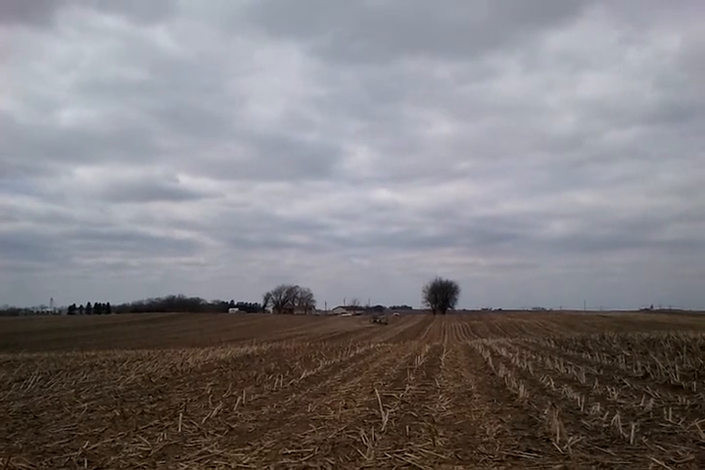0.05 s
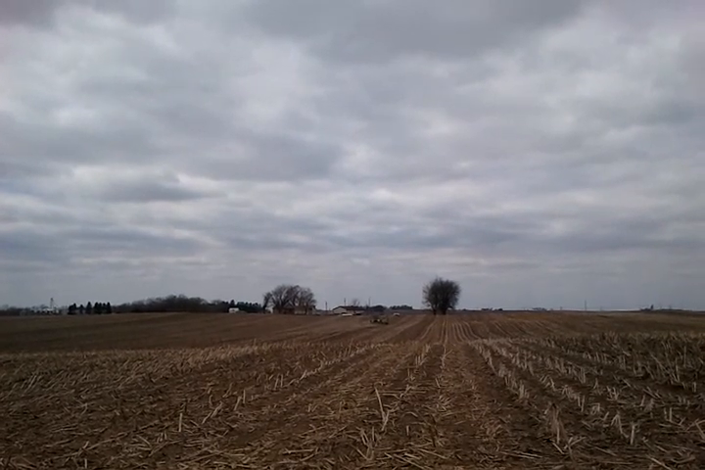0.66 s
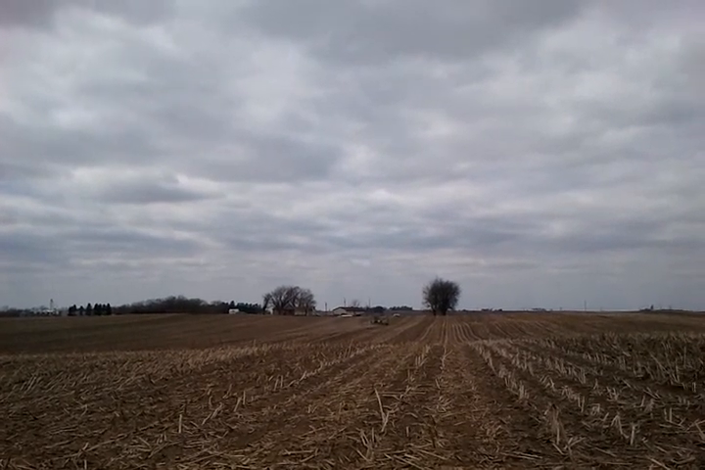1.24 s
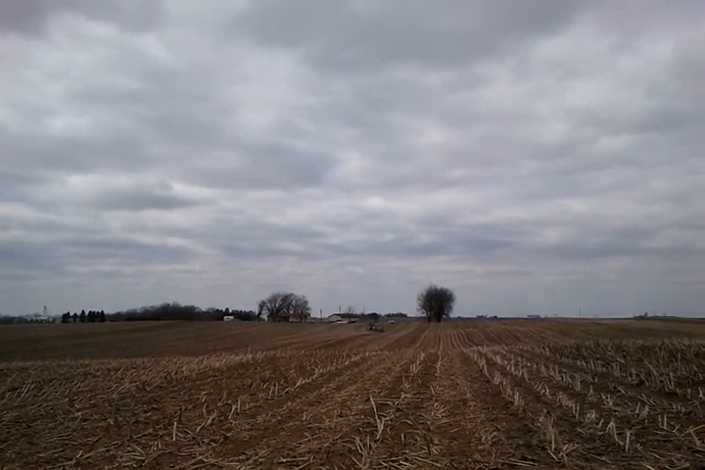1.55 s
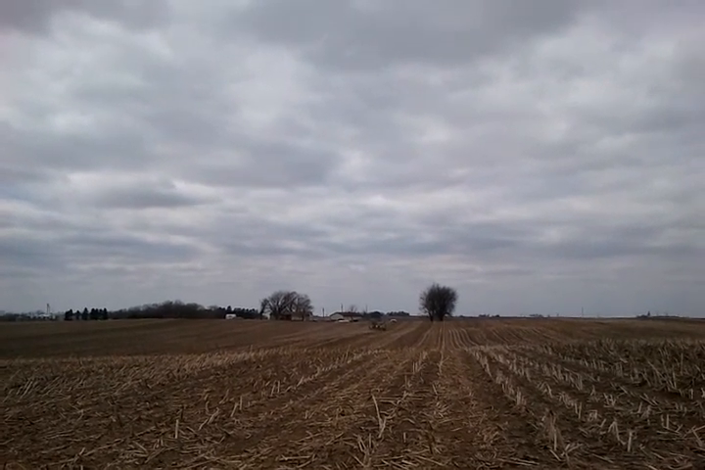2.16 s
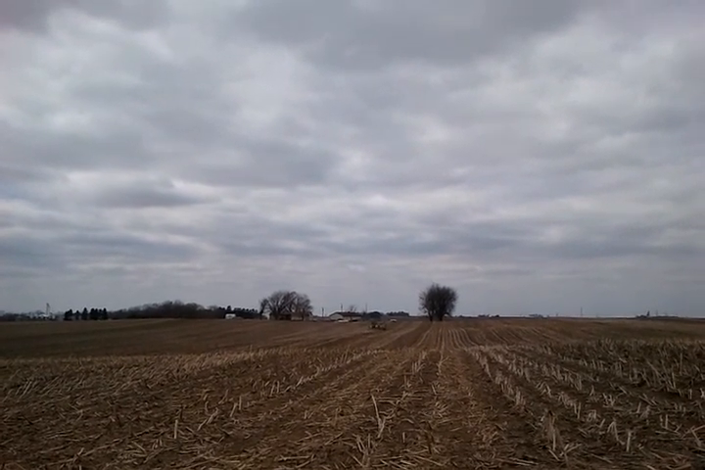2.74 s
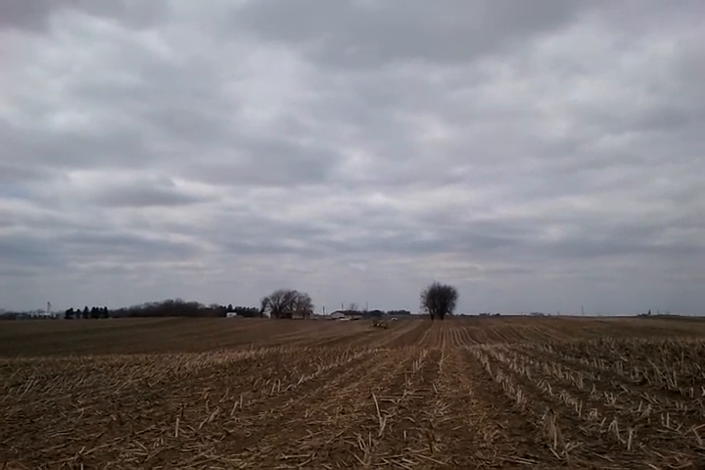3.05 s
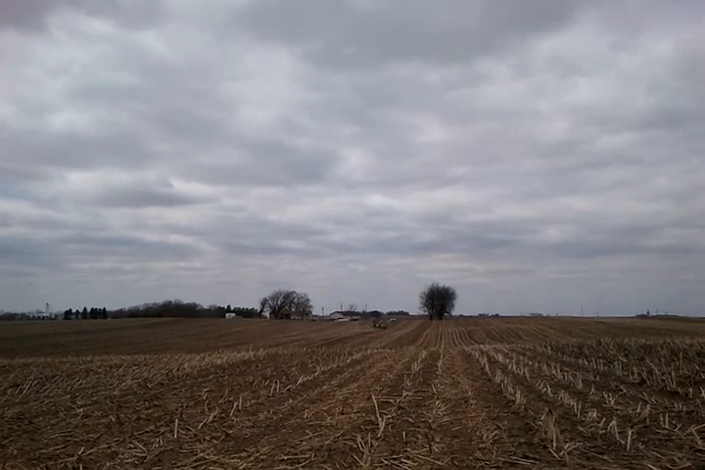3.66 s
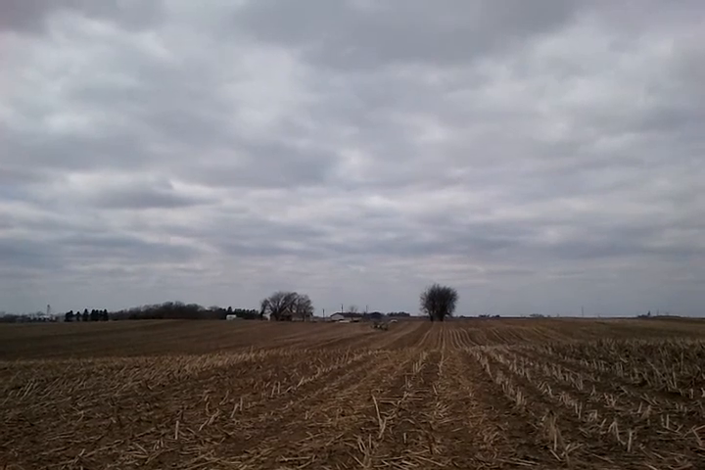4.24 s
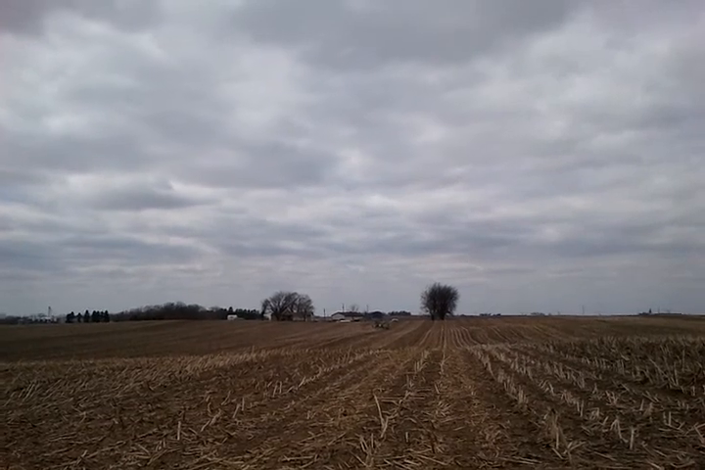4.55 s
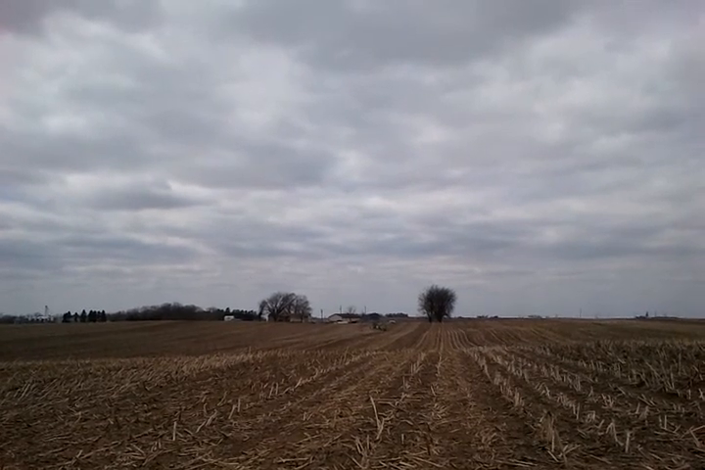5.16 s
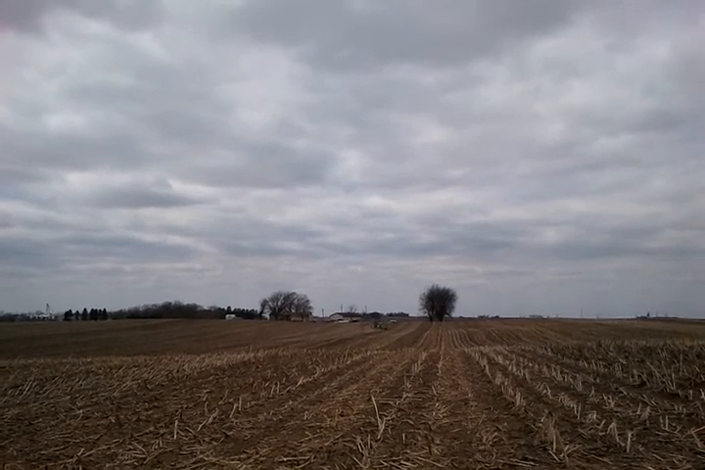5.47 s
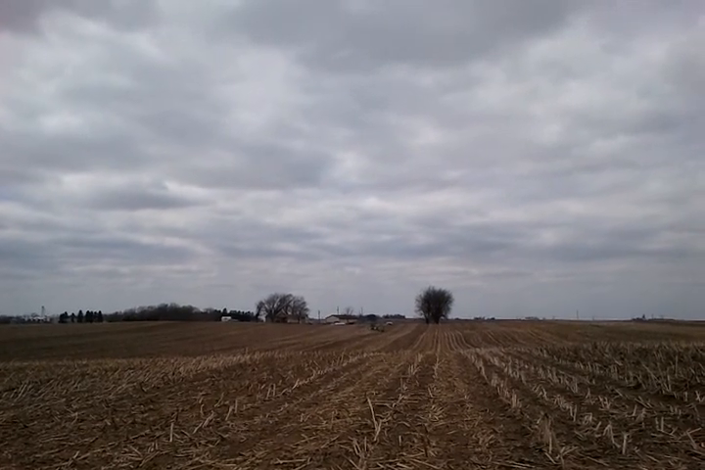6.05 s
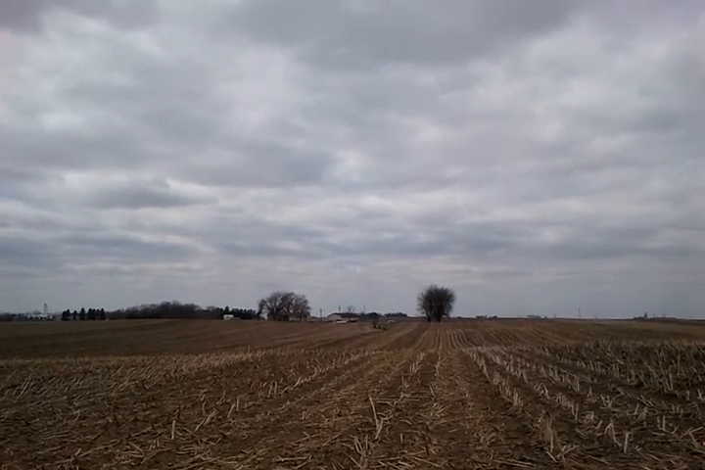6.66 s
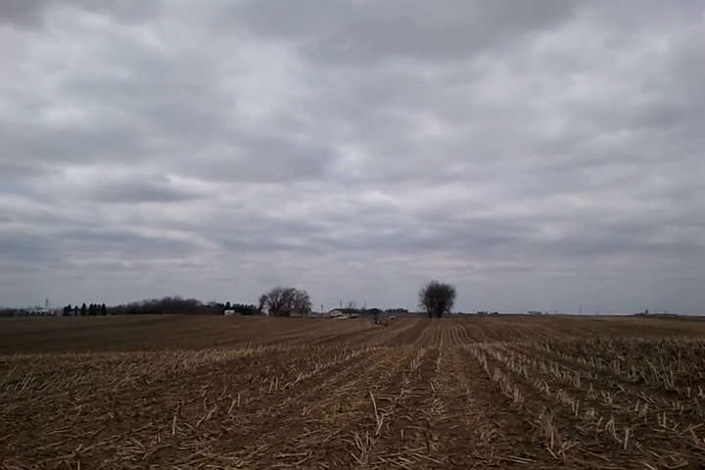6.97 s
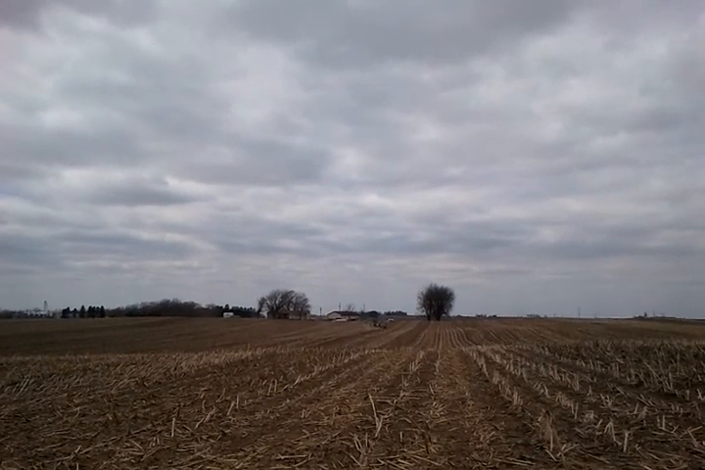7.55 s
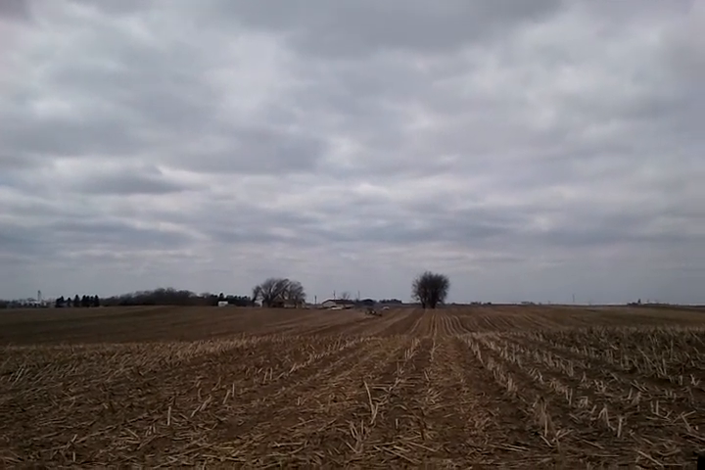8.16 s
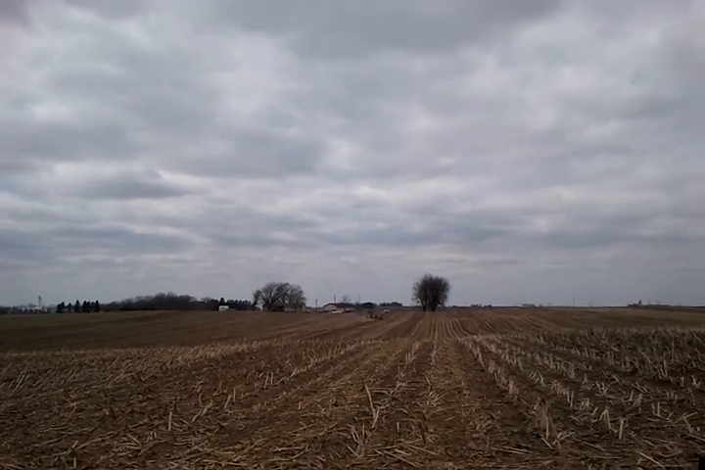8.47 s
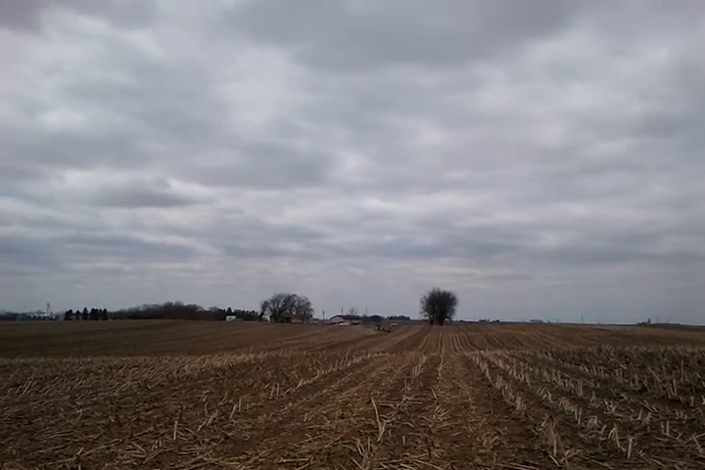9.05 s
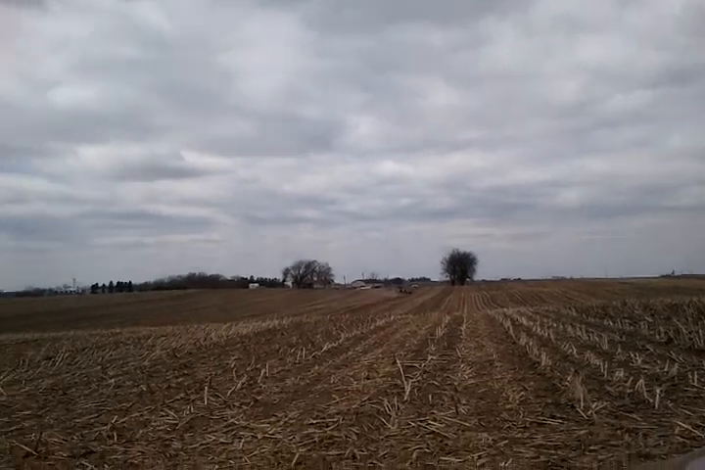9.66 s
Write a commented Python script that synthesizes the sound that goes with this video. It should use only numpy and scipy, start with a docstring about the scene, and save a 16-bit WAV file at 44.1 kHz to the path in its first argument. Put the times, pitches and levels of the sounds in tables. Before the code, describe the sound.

Two engines idle far off across an open field, their low notes beating together in a steady, throbbing drone. Faint chuffing machinery, fan whines and a wide distant roar sit behind it, and a thin high whistle comes and goes. A small bird chirps early on and again later. Midway, a soft double puff of air bumps the microphone.

```python
"""An open stubble field under a grey sky, with two engines droning far off.
Each exhaust radiates multiples of its firing rate, and the two low notes beat against each other over
the chuffing resonances of machine housings, faint fan tones and a wide distant roar. A small bird calls
twice and a thin whistle comes and goes. A double puff of air bumps the microphone, which overloads in
the deepest bass troughs."""
import sys
import numpy as np
from scipy import signal
from scipy.fft import rfft, irfft, next_fast_len
from scipy.io import wavfile

SR = 44100
rng = np.random.default_rng(int(sys.argv[2]) if len(sys.argv) > 2 else 0)


def generate_wav(sig):
    """Save sig (samples, or channels by samples) to the path in sys.argv[1] as 16-bit PCM at SR."""
    pcm = np.round(np.clip(np.atleast_2d(sig).T, -1, 1) * 32767).astype(np.int16)
    wavfile.write(sys.argv[1], SR, pcm)


N = 432621
TIME = np.arange(N) / SR
FFT_SIZE = next_fast_len(N, real=True)
BIN_HZ = np.fft.rfftfreq(FFT_SIZE, 1 / SR)

# The slower engine sags, surges, then settles:
# (time [s], firing rate [Hz], level [dB], overtone gain [dB])
SLOW_ENGINE_RUN = [(0, 34.9, -37, -1), (.3, 35.1, -31.5, 0.5), (.7, 34.5, -36.5, 0), (1.05, 33.9, -30, -5),
                   (1.4, 35.35, -27.5, -5.5), (1.66, 35.93, -34.5, 4), (2.1, 35.74, -29, -0.5),
                   (2.45, 35.2, -36.5, 0.5), (2.75, 35.45, -34.5, 2), (3.15, 34.58, -33, -1.5),
                   (4.1, 34.72, -33.5, -1.5), (4.75, 35.36, -36.5, 0.5), (5.6, 34.47, -34, 0.5),
                   (6.36, 35.03, -33, 1), (7.45, 34.88, -33, -2.5), (9.8, 34.78, -33.5, -0.5)]
# Swell of the drone's overtones, the deepest resonances and the low roar: (time [s], level [dB])
BASS_SWELL = [(0, 0.5), (.7, 2), (1.45, 0.3), (1.85, 2), (2.2, 1), (2.62, 3), (2.95, -2), (3.4, 2.2),
              (3.8, -1.2), (4.4, 1.5), (5.1, -1.5), (5.33, 2), (5.8, .3), (6.1, -5.5), (6.42, 2), (6.9, -3),
              (7.35, 1.1), (8.05, 1), (8.4, -0.5), (9.3, 1), (9.52, -5), (9.8, -2)]


def gain_of(db):
    """Amplitude ratio of a level: a factor of ten per 20 dB."""
    return 10 ** (np.asarray(db) / 20)


def unit_rms(x):
    """Normalisation to an rms of 1."""
    return x / np.sqrt(np.mean(x ** 2) + 1e-20)


def follow(rows):
    """Linear interpolation in time of each column after the first."""
    times, *columns = np.transpose(rows)
    return [np.interp(TIME, times, column) for column in columns]


def envelope(start, length, edge_s):
    """Trapezoidal envelope: a linear rise, a hold and a linear fall."""
    return np.clip(np.minimum(TIME - start, start + length - TIME) / edge_s, 0, 1)


def noise(density):
    """Gaussian noise with the given spectral density, in amplitude per root Hz."""
    real, imaginary = rng.standard_normal((2, len(BIN_HZ)), dtype=np.float32) * np.float32(density)
    return irfft(real + 1j * imaginary, FFT_SIZE)[:N] * np.sqrt(SR * FFT_SIZE) / 2


def drift(rate_hz):
    """Random fluctuation of rms 1: noise low-passed at the given rate."""
    t = TIME[::64]
    hz = np.fft.rfftfreq(len(t), t[1])
    spectrum = rfft(rng.standard_normal(len(t))) / (1 + (hz / rate_hz) ** 2)
    return np.interp(TIME, t, unit_rms(irfft(spectrum, len(t))))


def phase_of(hz):
    """Phase as the time integral of frequency, from a random starting angle."""
    return 2 * np.pi * (np.cumsum(hz) / SR + rng.random())


def propagation_db(hz):
    """Frequency-dependent fading: bass, low mids and treble carry unevenly over the field."""
    # Swell of the low mids: (time [s], level [dB])
    mid_swell = [(0, -2), (.65, 0.5), (.9, -2), (1.45, -.7), (1.8, 1.7), (2.0, -2.5), (2.6, 1), (3.5, -2.2),
                 (3.8, 2.5), (4.15, -1.5), (4.4, 2.3), (5.55, -3.5), (6.0, 1.8), (6.4, -2.7), (7.0, 1),
                 (7.35, -1), (7.95, 1.5), (8.35, 0.8), (8.6, -2.5), (9.1, 1), (9.8, 0.5)]
    # Swell of the higher machine noise: (time [s], level [dB])
    treble_swell = [(0, .5), (1.25, -0.9), (1.55, -.8), (1.9, 0.5), (2.55, 0.5), (3.6, -1), (3.77, 0.2),
                    (4.0, -0.2), (4.9, -1), (5.8, -1), (6.7, -.3), (7.03, 1), (7.7, -0.5), (8.08, 1.5),
                    (8.6, -.9), (8.85, 0), (9.25, -.2), (9.45, 0.7), (9.8, -1)]
    return follow(BASS_SWELL if hz < 250 else mid_swell if hz < 600 else treble_swell)[0]


def distant_roar(swell_share=0.45, waver_db=0.62, steady_above_hz=3000):
    """Broadband noise in octave bands: each wavers, and all but the highest swell with the machinery."""
    # Noise spectrum of the open country: (frequency [Hz], spectral density [dB per Hz])
    spectrum = [(10, -52.5), (90, -54), (120, -55), (150, -56), (200, -61.5), (275, -64), (390, -68.5),
                (600, -72.5), (950, -77.5), (2000, -80.5), (3900, -85), (4800, -89.5), (6300, -87),
                (7000, -92.5), (7450, -101), (7600, -111)]
    hz, db = np.transpose(spectrum)
    density = gain_of(np.interp(np.log(BIN_HZ + 1), np.log(hz), db))
    centres = np.geomspace(100, 6400, 7)
    out = np.zeros(N)
    for centre, selector in zip(centres, np.eye(len(centres))):
        band = noise(density * np.sqrt(np.interp(BIN_HZ, centres, selector)))
        swell_db = swell_share * propagation_db(centre) / (1 + (centre / steady_above_hz) ** 4)
        out += band * gain_of(swell_db + waver_db * drift(15))
    return out


def fans_and_gears(wander_hz=1.1, fade_db=1.6, decline_db_per_s=0.2):
    """Tonal noise of rotating parts: the lowest fan swells and ebbs, the rest slowly grow fainter."""
    # The lowest, clearest fan: (time [s], frequency [Hz], level [dB])
    fan_run = [(0, 482, -52), (.5, 478, -48.5), (.9, 478, -56), (1.85, 477.4, -51), (2.3, 479, -52.5),
               (2.75, 482, -56.5), (4.45, 482.5, -52.5), (5.0, 480.5, -58.5), (6.15, 479.5, -51),
               (7.3, 481.6, -52), (8.1, 478.5, -51.5), (8.65, 479, -55), (9.25, 480, -58.5),
               (9.8, 482, -50)]
    # Other fans and gears: (frequency [Hz], level [dB])
    whine_tones = [(673.7, -58), (743, -61.5), (1013, -66.5), (1070, -61.5), (2147, -73.5), (3217, -64)]
    whines = np.zeros(N)
    for hz, db in whine_tones:
        whines += gain_of(db + fade_db * drift(4.1)) * np.sin(phase_of(hz + wander_hz * drift(2)))
    whines *= gain_of(-decline_db_per_s * (TIME - TIME.mean()))
    fan_hz, fan_db = follow(fan_run)
    fan = gain_of(fan_db + fade_db * drift(4.9)) * np.sin(phase_of(fan_hz + wander_hz * drift(2)))
    return np.sqrt(2) * (fan + whines)


def clatter(fade_db=1.55, rasp_db=-85, rasp_hz=1600, rasp_width_hz=1100):
    """Forced resonance: moving parts ring the housings, amplitude-modulated in two chuffing rhythms."""
    # Housing modes: (frequency [Hz], nominal bandwidth [Hz], peak density [dB per Hz])
    housing_modes = [(153.5, 8, -58.5), (178, 8.3, -56), (235.3, 14, -62), (325, 46, -63.5),
                     (414, 17, -69.5), (449.7, 10, -69), (682, 18, -71), (721, 10, -71.5), (827, 18, -74),
                     (870, 23, -73.5), (1028, 42, -72.5), (1376, 19, -75.5), (1540, 19, -79),
                     (1615, 49, -79), (2046, 21, -81), (2354, 130, -82), (2900, 130, -86),
                     (3400, 120, -86.5)]
    ringing = np.zeros(N)
    for hz, width, db in housing_modes:
        mode = noise(gain_of(db) / (1 + ((BIN_HZ - hz) / (0.84 * width)) ** 2))
        ringing += mode * gain_of(fade_db * drift(3.8) + propagation_db(hz))
    rasp = noise(gain_of(rasp_db) / (1 + ((BIN_HZ - rasp_hz) / rasp_width_hz) ** 2))
    rasp *= gain_of(propagation_db(rasp_hz))
    chuff = np.ones(N)
    for rate_hz, depth in ((13.3, 0.18), (21.9, 0.23)):
        chuff += depth * np.sin(phase_of(rate_hz + 0.2 * drift(0.94)))
    return (ringing + rasp) * chuff


def whistle(pitch_hz=6122, wander_hz=27, flutter_db=2.6, depth=0.43, pulse_hz=28.3, rest_db=-67.5):
    """A thin tone, perhaps a dry bearing, amplitude-modulated at the slower engine's rate and below."""
    # Spells of whistling, with a faint tone lingering between: (start [s], duration [s], level [dB])
    spells = [(.17, .62, -58), (0.925, 0.41, -57.5), (2.0, 0.33, -57), (2.42, 0.19, -59.5),
              (2.92, 0.61, -58), (3.66, 0.25, -56.5), (3.929, .43, -59.5), (4.481, 0.43, -61.5),
              (4.969, .17, -57), (5.342, 0.3, -58), (5.639, 0.74, -62.5), (6.35, .62, -59.5),
              (6.971, .76, -58), (7.769, 0.14, -53.5), (7.933, 0.44, -57.5), (8.46, 0.66, -58.5),
              (9.098, 0.76, -61.5)]
    swells = [gain_of(db) * envelope(start, length, edge_s=0.025) for start, length, db in spells]
    amplitude = np.maximum(np.max(swells, axis=0), gain_of(rest_db))
    tone = np.sin(phase_of(pitch_hz + wander_hz * drift(100)))
    firing_hz = follow(SLOW_ENGINE_RUN)[0]
    pulses = 1 + depth * (np.sin(phase_of(firing_hz)) + np.sin(phase_of(pulse_hz + 0.2 * drift(1))))
    return amplitude * unit_rms(tone * pulses * gain_of(flutter_db * drift(40)))


def bird(waver_share=0.004, flutter_db=1.5, scoop_s=0.0064, flick_s=0.0037):
    """Frequency modulation of nearly pure notes, which may drop onto their pitch, slide and flick up."""
    # Notes of the two calls:
    # (start [s], duration [s], pitch [Hz], slide [Hz/s], scoop in [Hz], flick out [Hz], level [dB])
    notes = [ (1.293, 0.089, 6940, -1700, 400, 900, -49), (1.404, .017, 6850, 0, 699.5, 699.5, -54.5),
             (7.516, 0.05, 5580, 4998, 450, 0, -44), (7.592, 0.017, 6000, 25000, 1499, 1400, -45.5),
             (7.645, .026, 6280, 2000, 0, 0, -51), (7.729, 0.052, 6640, 3700, 0, 0, -56)]
    waver = 1 + waver_share * drift(150)
    flutter = gain_of(-flutter_db * drift(50))
    out = np.zeros(N)
    for start, length, pitch, slide, scoop, flick, db in notes:
        shape = envelope(start, length, edge_s=0.0045)
        on = shape > 0
        t = TIME[on] - start
        hz = pitch + slide * (t - length / 2)
        hz += scoop * np.exp(-(t / scoop_s) ** 2) + flick * np.exp((t - length) / flick_s)
        out[on] += gain_of(db) * shape[on] * np.sin(phase_of(hz * waver[on]))
    return np.sqrt(2) * flutter * out


def air_puffs():
    """Turbulent pressure on the microphone: two soft, low bumps, one running into the next."""
    # Bumps of air: (start [s], duration [s], centre [Hz], half-width [Hz], level [dB])
    puffs = [(4.892, .065, 61.7, 25, -22.5), (4.955, 0.076, 46, 17, -21)]
    out = np.zeros(N)
    for start, length, centre_hz, half_width_hz, db in puffs:
        shape = envelope(start, length, edge_s=0.022)
        eddies = noise(1 / (1 + ((BIN_HZ - centre_hz) / half_width_hz) ** 4))
        out += gain_of(db) * shape * eddies / eddies[shape > 0].std()
    return out


def exhaust(firing_hz, level_db, orders, overtones_db, fade_db, fade_hz, jitter_rad):
    """Fourier series of exhaust pulses; moving air fades each order on its own, the weak ones most."""
    phase = phase_of(firing_hz) + jitter_rad * drift(8.4)
    out = np.zeros(N)
    for multiple, db in orders:
        depth_db = fade_db * (1 + min(abs(db), 20) / 5)
        order_db = db + depth_db * drift(fade_hz) + overtones_db * (multiple > 1)
        offset = 2 * np.pi * rng.random() * (multiple % 1 > 0)  # whole orders crest together
        out += gain_of(order_db) * np.cos(multiple * phase + offset)
    return np.sqrt(2) * gain_of(level_db) * out


def slow_engine(wander_hz=0.092):
    """Periodic firing at a low rate gives closely spaced harmonics: a deep throb under the drone."""
    # Exhaust orders: (multiple of the firing rate, relative level [dB])
    orders = [(.5, -4.5), (1, 0.5), (2, -23), (3, 0), (4, -12), (6, -13.5)]
    firing_hz, level_db, overtones_db = follow(SLOW_ENGINE_RUN)
    firing_hz += wander_hz * drift(1.25)
    return exhaust(firing_hz, level_db, orders, overtones_db, fade_db=0.88, fade_hz=9.1, jitter_rad=0.071)


def loud_engine(mean_db=-20.5, db_per_hz=0.6, decline_db_per_s=0.0647):
    """The main drone: a fundamental at the firing rate, with subharmonics from four unequal cylinders."""
    # Exhaust orders: (multiple of the firing rate, relative level [dB])
    orders = [(.25, -17), (.5, -28.5), (.75, -27), (1, 0), (1.5, -28), (2, -20), (2.5, -28.5), (4, -43)]
    # A steady idle that sags once and overshoots as the governor catches it: (time [s], firing rate [Hz])
    idle_speed = [(0, 85.1), (.9, 84.4), (1.7, 85), (2.2, 84.6), (5.1, 84.8), (6.0, 84.45), (6.5, 85),
                  (7.65, 84.6), (8.0, 83.85), (8.7, 85.4), (9.6, 84.2)]
    firing_hz, = follow(idle_speed)
    overtones_db, = follow(BASS_SWELL)
    level_db = mean_db + db_per_hz * (firing_hz - firing_hz.mean())  # louder when it runs faster
    level_db -= decline_db_per_s * (TIME - TIME.mean())
    return exhaust(firing_hz, level_db, orders, overtones_db, fade_db=0.09, fade_hz=6.2, jitter_rad=0.02)


def scene():
    """Superposition in a free field: all sources add at one microphone."""
    machinery = loud_engine() + slow_engine() + clatter() + fans_and_gears()
    return (machinery + distant_roar() + whistle() + bird() + air_puffs())[None]


def record(dry, knee=0.13, headroom=0.035, choke=0.32, bass_hz=300, cutoff_hz=7600, dc_offset=-0.4245):
    """Asymmetric saturation: the microphone rounds off deep bass troughs and chokes the sound above,
    so the roar purrs at the firing rate. The output is band-limited and sits on a steady offset."""
    bass = signal.sosfiltfilt(signal.butter(2, bass_hz, fs=SR, output="sos"), dry)
    excess = np.maximum(-bass - knee, 0)
    overload = np.tanh(excess / headroom)
    rounded_bass = bass + excess - headroom * overload
    choked_highs = (dry - bass) * (1 - choke * overload)
    low_pass = signal.firwin(2047, cutoff_hz, window=("kaiser", 9), fs=SR)
    return signal.oaconvolve(rounded_bass + choked_highs, low_pass[None], "same") + dc_offset


dry = scene()
out = record(dry)
generate_wav(out)
```